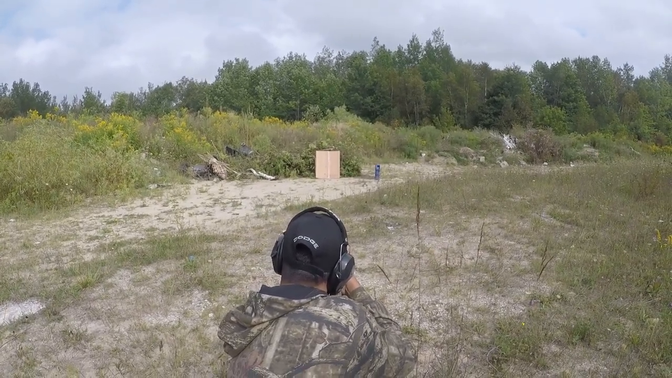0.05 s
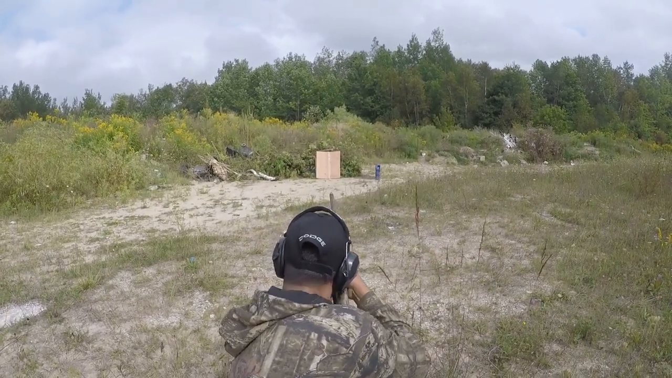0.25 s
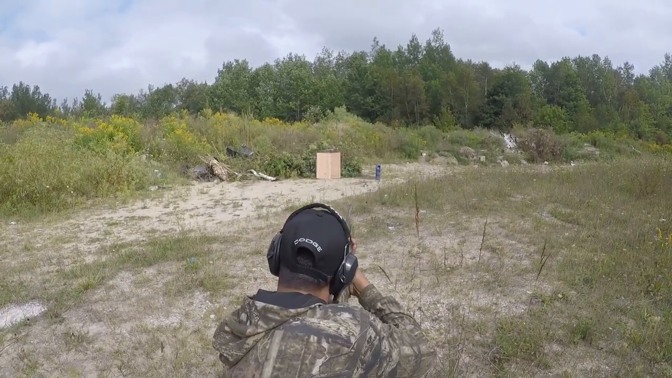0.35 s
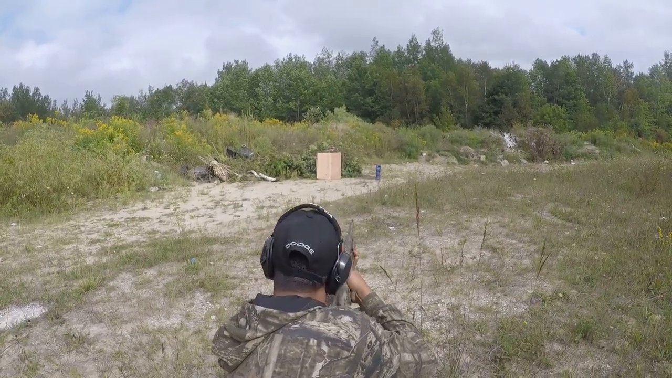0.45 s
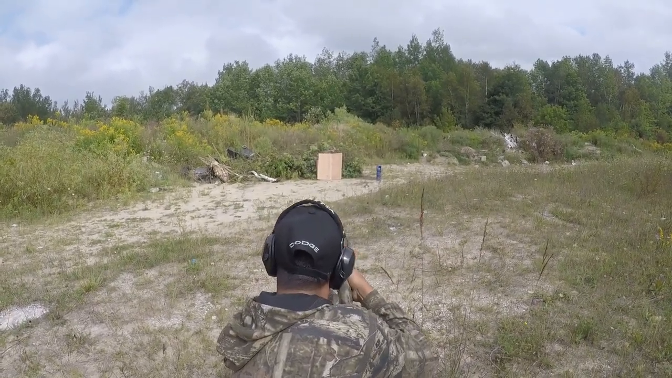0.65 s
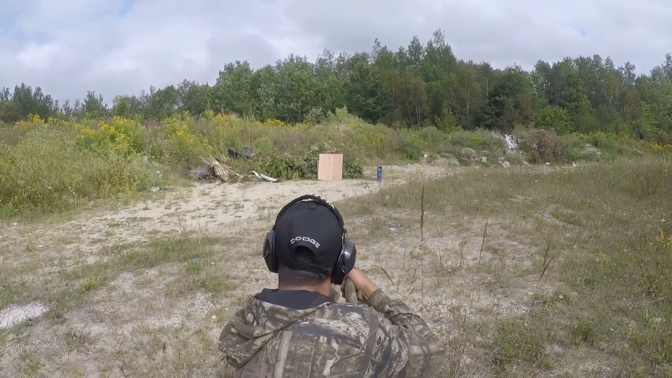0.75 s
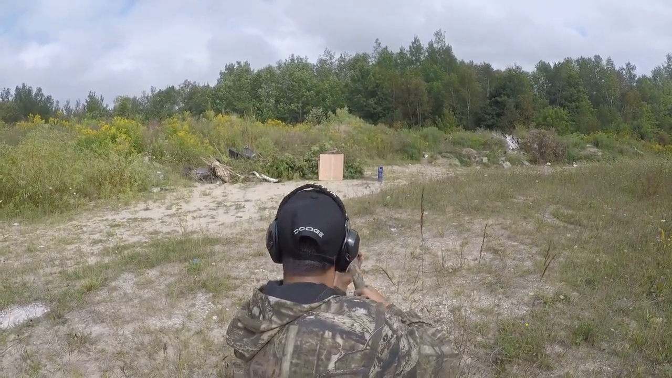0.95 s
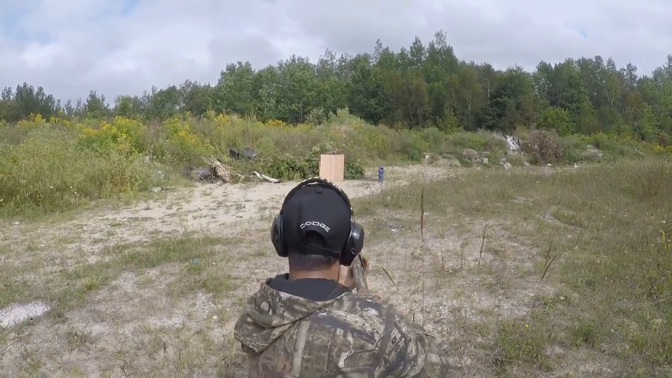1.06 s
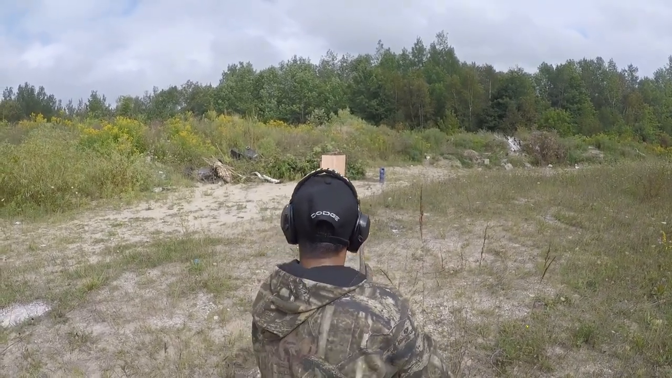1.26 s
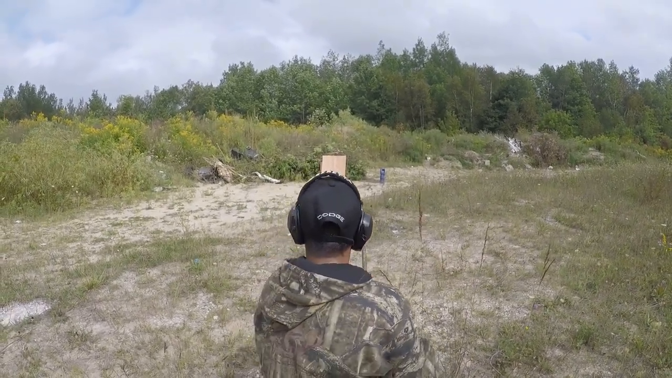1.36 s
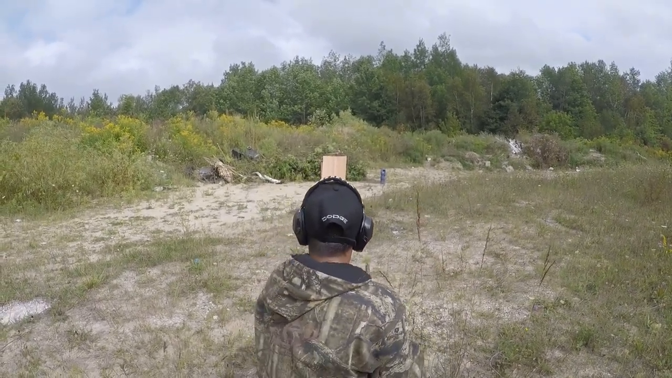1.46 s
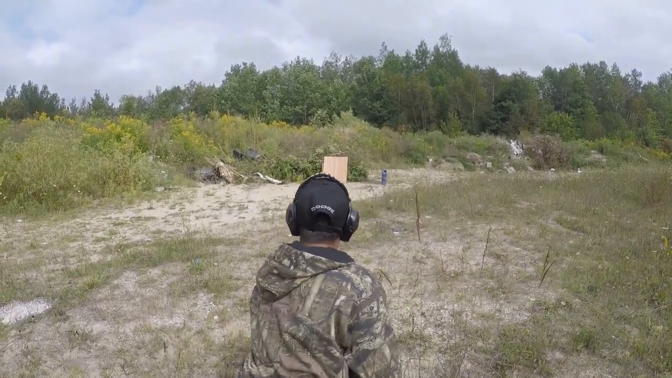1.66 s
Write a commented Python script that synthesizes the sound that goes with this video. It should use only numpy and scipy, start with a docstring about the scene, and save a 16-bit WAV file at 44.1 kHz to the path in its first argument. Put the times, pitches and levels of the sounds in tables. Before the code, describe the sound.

A single shotgun shot heard from just behind the shooter: a small action tick, a short boom with hard clipped cracks, dull thumps from the ground, then a hissing tree echo fading over faint crickets and wind.

```python
"""An open range: one shotgun shot, heard from just behind the shooter.
The action ticks, then a sine boom swells under rapid buzzing pulses and ends in two hard noise cracks.
A dull thump precedes the shot and more come back from the near ground as decaying sines over a rumble.
The tree line returns a long hissing echo of noise bands, each with its own decay.
A swept-tone cricket trills in the grass, lower after the shot; light wind noise nudges the microphone."""
import sys
import numpy as np
from scipy import signal
from scipy.fft import rfft, irfft
from scipy.io import wavfile
from scipy.ndimage import uniform_filter1d

SR = 44100
rng = np.random.default_rng(int(sys.argv[2]) if len(sys.argv) > 2 else 0)


def store_wav(level_fs):
    """Save 16-bit WAV to argv[1]."""
    pcm = np.round(np.clip(np.atleast_2d(level_fs), -1, 1) * 32767)
    wavfile.write(sys.argv[1], SR, pcm.T.astype(np.int16))


N = 74970
T = np.arange(N) / SR  # time in s


def from_db(db):
    """Logarithmic level: decibels to amplitude gain."""
    return 10 ** (np.asarray(db) / 20)


def rms_one(x):
    """Power normalisation: scale to unit rms."""
    return x / np.sqrt(np.mean(x ** 2) + 1e-20)


def pan(db):
    """Interaural level difference: two gains, left louder for positive dB."""
    return from_db(np.array([[db], [-db]]) / 2)


def level(rows):
    """Level envelope: gain over time, interpolated in decibels."""
    return from_db(np.interp(T, *np.transpose(rows)))


def at_hz(rows, hz, axis=1):
    """Logarithmic pitch scale: interpolate a table column over log frequency."""
    rows = np.array(rows)
    return np.interp(np.log(hz + 1), np.log(rows[:, 0]), rows[:, axis])


def stereo_white(side_db):
    """Partial coherence: shared white noise plus an opposed part at side_db."""
    mid, side = rng.standard_normal((2, N))
    return mid + from_db(side_db) * side * np.array([[1], [-1]])


def noise(colour, side_db):
    """Spectral shaping: steady stereo noise of a given colour, rms 1."""
    spectrum = rfft(stereo_white(side_db))
    gain = from_db(at_hz(colour, np.fft.rfftfreq(N, 1 / SR)))
    return rms_one(irfft(spectrum * gain, N))


def butter(x, hz, kind, order=2):
    """Maximally flat passband: Butterworth filter."""
    return signal.sosfilt(signal.butter(order, hz, kind, fs=SR, output="sos"), x + 1e-18)


def resonate(x, hz, width_hz):
    """Damped resonator: one pole pair, gain near 1 at its peak."""
    r = np.exp(-np.pi * width_hz / SR)
    zeros = np.array([1, 0, -1]) * (1 - r * r) / 2
    poles = [1, -2 * r * np.cos(2 * np.pi * hz / SR), r * r]
    return signal.lfilter(zeros, poles, x + 1e-18)


def burst(s, rise, decay):
    """Impulsive excitation: linear rise, then exponential decay."""
    return np.clip((T - s) / rise, 0, 1) * np.exp(-np.maximum(T - s - rise, 0) / decay)


def swell(s, attack, hold, release):
    """Smooth onset: attack, hold and release with rounded corners."""
    ramp = np.interp(T - s, np.cumsum([0, attack, hold, release]), [0, 1, 1, 0])
    return np.sin(np.pi / 2 * ramp) ** 2


def push_pulls(rows, width_s):
    """Bipolar impulse: each row (centre_s, peak level_db) gives a smooth push, then a pull."""
    total = 0
    for s, db in rows:
        x = (T - s) / width_s
        total = total - from_db(db) * x * np.exp(.5 - .5 * np.minimum(x ** 2, 10 ** 2))
    return total


# Colour of the turbulent roar under the boom: frequency_hz, gain_db
ROAR_COLOUR = [(30, -28), (100, -11.5), (300, 13), (700, 10.5), (1400, -2), (3000, -6.5), (6500, -10),
               (10000, -15), (15000, -50.5)]
# Rapid buzzing pulses during the shot, before the band-pass: centre_s, level_db
PULSES = [(0.2024, -22), (0.21285, -3), (0.2162, -11), (0.22285, 1), (0.2262, -11), (0.2295, -10),
          (0.23290, -3)]
# Sharp cracks, from the action's tick to the first reflections:
# start_s, level_db, decay_s, left_over_right_db
CRACKS = [(0.1914, -14.5, 0.00054, -3), (0.195, -34, 0.0026, 2), (0.2025, -34, 0.00077, 7),
          (0.2125, -24, 0.0035, 2), (0.2233, -18.5, 0.0025, -3), (0.23, -7.5, 0.0017, -1),
          (0.2337, -1, 0.00097, -4), (0.2928, -31, 0.0027, -2.5), (0.3084, -25.5, 0.00027, 3),
          (0.319, -38.5, 0.0013, 4)]
# Colour shared by the cracks: frequency_hz, gain_db
CRACK_COLOUR = [(200, -25.5), (900, 6), (2100, -2), (3200, 4), (4500, -3.5), (6000, 3), (7600, -17.5),
                (10500, -42), (12200, -14.5), (15000, -47)]
BOOM_S, BOOM_HZ, BOOM_DB, BOOM_PAN_DB = 0.1985, 140.6, -12, 8.5
ROAR_DB = -19.5
RING_HZ, RING_WIDTH_HZ, RING_DB, RING_PAN_DB = 7930, 40, -31, -8
PULSE_S, PULSE_BAND_HZ, PULSE_RIGHT_LEAD_S = 0.00026, [583, 966], 0.00012
CRACK_RISE_S = 0.00038


def blast():
    """Muzzle blast: tonal boom, turbulent roar and thin steel ring, with buzzing pulses and cracks."""
    body = swell(BOOM_S, attack=0.032, hold=0.005, release=0.005)
    tone = np.sin(2 * np.pi * BOOM_HZ * (T - BOOM_S))
    boom = from_db(BOOM_DB) * np.sqrt(body) * tone * pan(BOOM_PAN_DB)
    roar_swell = swell(BOOM_S, attack=0.022, hold=0.015, release=0.01)
    roar = from_db(ROAR_DB) * roar_swell * noise(ROAR_COLOUR, side_db=-6)

    # keeping only the phase of resonant noise gives a wavering tone of even strength
    narrow = resonate(rng.standard_normal(N), RING_HZ, RING_WIDTH_HZ)
    ring_tone = np.cos(np.angle(signal.hilbert(narrow)))
    ring = from_db(RING_DB) * body * ring_tone * pan(RING_PAN_DB)

    left = butter(push_pulls(PULSES, PULSE_S), PULSE_BAND_HZ, "band")
    right = np.interp(T + PULSE_RIGHT_LEAD_S, T, left)
    pulses = np.array([left, right])

    crack_gain = sum(from_db(db) * burst(s, CRACK_RISE_S, decay) * pan(pan_db)
                     for s, db, decay, pan_db in CRACKS)
    cracks = crack_gain * noise(CRACK_COLOUR, side_db=-10)
    return boom + roar + ring + pulses + cracks


# Dull thumps around the shot, before filtering: start_s, pitch_hz, level_db, decay_s, rustle_level_db
THUMPS = [(0.102, 310, -27.5, 0.004, -46), (0.2355, 246, -14.5, 0.0045, -35),
          (0.293, 188, -14.5, 0.0064, -39.5), (0.3328, 180.6, -23.5, 0.016, -76),
          (0.3771, 254, -21.5, 0.0036, -40.5), (0.3901, 223.4, -21.5, 0.015, -76),
          (0.4288, 200, -24, 0.0062, -47.5)]
# Colour of the rustle on each thump: frequency_hz, gain_db
RUSTLE_COLOUR = [(150, 8), (480, 3), (800, 2), (2000, -3), (4000, -9.5), (6300, -0.5), (9000, -18),
                 (15000, -35.5)]
# Low rumble scattered by the near ground: time_s, level_db
RUMBLE = [(0.2, -86), (0.245, -73), (0.27, -49), (0.305, -34.5), (0.355, -44), (0.395, -34.5),
          (0.44, -41.5), (0.5, -43.5), (0.62, -75), (0.8, -81)]
# Colour of that rumble: frequency_hz, gain_db
RUMBLE_COLOUR = [(30, -20.5), (90, -9), (170, 4.5), (270, -5.5), (480, -21.5), (1000, -29.5), (6000, -28),
                 (10000, -48.5), (15000, -77.5)]
THUMP_RISE_S, THUMP_LOW_CUT_HZ, THUMP_HIGH_CUT_HZ = 0.0012, 170, 563
RUSTLE_LEAD_S, RUSTLE_DECAY_S = 0.005, 0.028


def thumps():
    """Damped oscillation: short low rings, each with a noise rustle, over scattered rumble."""
    low, rustle_gain = 0, 0
    for s, hz, db, decay, rustle_db in THUMPS:
        ring = np.sin(2 * np.pi * hz * (T - s))
        low = low + from_db(db) * burst(s, THUMP_RISE_S, decay) * ring
        brush = burst(s - RUSTLE_LEAD_S, THUMP_RISE_S, RUSTLE_DECAY_S)
        rustle_gain = rustle_gain + from_db(rustle_db) * brush
    rustle = rustle_gain * noise(RUSTLE_COLOUR, side_db=-2)
    hits = butter(low, THUMP_HIGH_CUT_HZ, "low") + rustle
    rumble = level(RUMBLE) * noise(RUMBLE_COLOUR, side_db=-19.5)
    return butter(hits, THUMP_LOW_CUT_HZ, "high") + rumble


# Colour of the echo at its start: frequency_hz, gain_db
ECHO_COLOUR = [(60, -49), (180, 2.5), (400, -8), (850, -2.5), (1400, -6.5), (3000, -5.5), (6200, -0.5),
               (8500, -9.5), (13000, -35)]
# Echo decay: frequency_hz, loss_during_hold_db_per_s (negative grows), t60_after_hold_s
ECHO_DECAY = [(150, -19, 0.86), (895, -14, 0.79), (2540, 8, 0.9), (5840, 44, 0.58), (12470, 64, 0.3)]
# Surges from the nearer and the farther rank of trees: centre_s, gain_db, width_s
SURGES = [(0.559, 5.5, 0.01), (0.674, 2.5, 0.038)]
# Colour of the dull lingering wash: frequency_hz, gain_db
LATE_COLOUR = [(60, 0.5), (130, -16), (210, 2.5), (420, -6.5), (950, 0.5), (1400, -7), (2500, -16.5),
               (4500, -26), (6300, -22), (9000, -50), (14000, -65)]
# Colour of the wash's brighter part, which fades sooner: frequency_hz, gain_db
LATE_TREBLE_COLOUR = [(700, -16), (1500, 3.5), (2600, 0.5), (4500, -7.5), (6300, -3), (8500, -30.5),
                      (14000, -49)]
# Hard slaps within the echo, before their resonance: centre_s, level_db
SLAPS = [(0.590, -19), (0.6256, -16)]
ECHO_S, ECHO_RISE_S, ECHO_HOLD_S, ECHO_DB = 0.5076, 0.051, 0.19, -35.5
ECHO_GRAIN_DB, ECHO_SIDE_DB, ECHO_CUT_HZ = 1.8, -9, 6630  # grain: rms flicker of level
LATE_DB, LATE_T60_S, LATE_PAN_DB = -46, 7.9, -2
LATE_TREBLE_DB, LATE_TREBLE_T60_S = -48, 1.85
SLAP_HZ, SLAP_WIDTH_HZ = 1000, 230


def tree_echo():
    """Diffuse scattering: the trees return noise whose treble dies first, then a wash lingers."""
    edges = np.geomspace(60, 15000, 17)
    flicker = rms_one(uniform_filter1d(rng.standard_normal(N), size=130))
    grain = from_db(ECHO_GRAIN_DB * flicker)
    # neighbouring bands take turns on two independent noises
    white = [stereo_white(ECHO_SIDE_DB) * grain for _ in range(2)]
    age = np.maximum(T - ECHO_S, 0)
    age_in_hold, age_after_hold = np.minimum(age, ECHO_HOLD_S), np.maximum(age - ECHO_HOLD_S, 0)
    decaying, steady = 0, 0
    for k, (low, high) in enumerate(zip(edges, edges[1:])):
        hz = np.sqrt(low * high)
        band = from_db(at_hz(ECHO_COLOUR, hz)) * butter(white[k % 2], [low, high], "band")
        hold_loss_db = at_hz(ECHO_DECAY, hz) * age_in_hold
        tail_loss_db = 60 * age_after_hold / at_hz(ECHO_DECAY, hz, axis=2)
        decaying = decaying + band * from_db(-hold_loss_db - tail_loss_db)
        steady = steady + band

    surge_db = sum(db * np.exp(-((T - s) / width) ** 2) for s, db, width in SURGES)
    rise = np.minimum(age / ECHO_RISE_S, 1)
    near = from_db(ECHO_DB + surge_db) * rise * decaying / np.std(steady)
    near = butter(near, ECHO_CUT_HZ, "low", order=3)

    # a 60 dB fall is a factor of 1000 in amplitude
    late_fade = burst(ECHO_S, rise=0.11, decay=LATE_T60_S / np.log(1000))
    late = from_db(LATE_DB) * late_fade * noise(LATE_COLOUR, side_db=-3)
    treble_fade = burst(ECHO_S, rise=0.2, decay=LATE_TREBLE_T60_S / np.log(1000))
    late_treble = from_db(LATE_TREBLE_DB) * treble_fade * noise(LATE_TREBLE_COLOUR, side_db=-3)
    slaps = resonate(push_pulls(SLAPS, width_s=0.00013), SLAP_HZ, SLAP_WIDTH_HZ)
    return (near + slaps + late_treble) * pan(-1.2) + late * pan(LATE_PAN_DB)


# Relative level of all crickets, lower after the shot: time_s, level_db
CRICKET_LEVEL = [(0, 0), (0.19, 0), (0.25, -26), (1.05, -24), (1.22, -15), (1.7, -13)]
# Relative level of the field's hiss, which drops with the shot and creeps back: time_s, level_db
BACKGROUND = [(0, 0), (0.19, 0), (0.25, -16), (1.1, -23.5), (1.4, -15), (1.7, -10.5)]
# Colour of the field's hiss: frequency_hz, gain_db
AIR_COLOUR = [(30, -26), (90, -49), (150, 4.5), (300, -3), (600, -11), (2000, -18.5), (3600, -15.5),
              (4600, -23), (7500, -16), (11000, -32), (15000, -49)]
CRICKET_HZ, CRICKET_FALL_HZ, CRICKET_WAVER_HZ = 3643, 850, 68  # centre, fall per stroke, rms waver
CRICKET_PER_S, CRICKET_FIRST_S, CRICKET_DB = 35.6, 0.019, -43.5
CHORUS_HZ, CHORUS_WIDTH_HZ, CHORUS_DB = 3684, 550, -54.5
AIR_DB = -45.5


def meadow():
    """Stridulation: a near cricket's wing strokes fall in pitch, over far crickets and field hiss."""
    stroke = ((T - CRICKET_FIRST_S) * CRICKET_PER_S) % 1  # progress through each stroke, 0 to 1
    waver = CRICKET_WAVER_HZ * rms_one(uniform_filter1d(rng.standard_normal(N), size=120))
    hz = CRICKET_HZ - CRICKET_FALL_HZ * (stroke - .5) + waver
    tone = np.sin(2 * np.pi * np.cumsum(hz) / SR)
    cricket = from_db(CRICKET_DB) * np.sin(np.pi * stroke) ** 4 * tone

    chorus = stereo_white(side_db=-11.5)
    for _ in range(2):
        chorus = resonate(chorus, CHORUS_HZ, CHORUS_WIDTH_HZ)
    insects = cricket * pan(-7.5) + from_db(CHORUS_DB) * rms_one(chorus)
    air = from_db(AIR_DB) * noise(AIR_COLOUR, side_db=2.5)
    return level(CRICKET_LEVEL) * insects + level(BACKGROUND) * air


# Wind on the microphone: time_s, level_db
WIND = [(0, -91), (0.3, -73), (1.0, -59.5), (1.3, -53.5), (1.7, -47.5)]
# Colour of the wind: frequency_hz, gain_db
WIND_COLOUR = [(15, -30), (40, -5), (90, -19), (200, -15), (500, -23.5), (2000, -68)]
# Single buffets of wind: centre_s, level_db, pitch_hz, width_s
BUFFETS = [(1.255, -43, 70, .006), (1.32, -46, 70, .006), (1.355, -41, 75, .005), (1.46, -41, 70, .005),
           (1.563, -27, 95, .007), (1.664, -35, 90, .004)]


def wind():
    """Turbulent pressure: low noise on the microphone, with a few soft buffets as windowed sines."""
    buffets = 0
    for s, db, hz, width in BUFFETS:
        window = np.exp(-np.minimum(((T - s) / width) ** 2, 10 ** 2))
        buffets = buffets + from_db(db) * window * np.sin(2 * np.pi * hz * (s - T))
    return level(WIND) * noise(WIND_COLOUR, side_db=-6) + buffets * pan(-1.5)


def scene():
    """Superposition: the shot, its echoes and the field around it."""
    return blast() + thumps() + tree_echo() + meadow() + wind()


CUTOFF_HZ = 15000  # the low-pass is 60 dB down from here up


def record(dry):
    """Overload and band limit: the loudest peaks clip, then the top is cut."""
    clipped = np.clip(dry, -1, 1)
    return signal.sosfilt(signal.cheby2(12, 60, CUTOFF_HZ, fs=SR, output="sos"), clipped)


dry = scene()
out = record(dry)
store_wav(out)
```